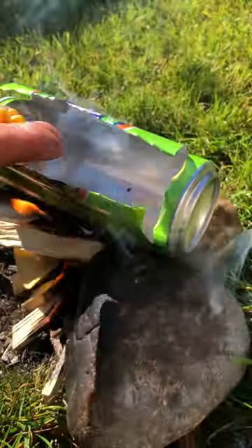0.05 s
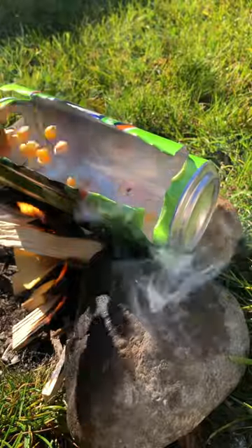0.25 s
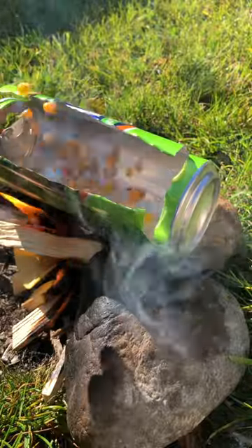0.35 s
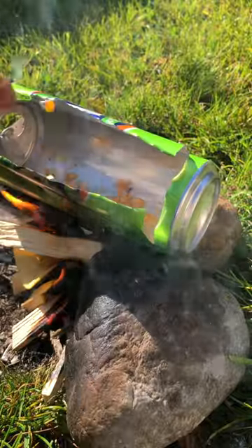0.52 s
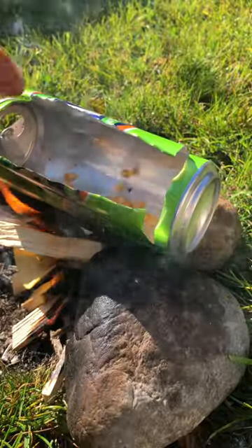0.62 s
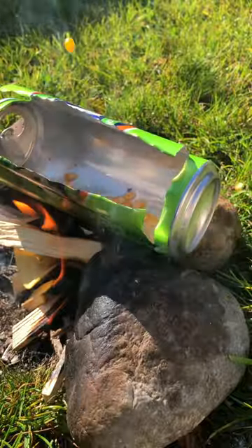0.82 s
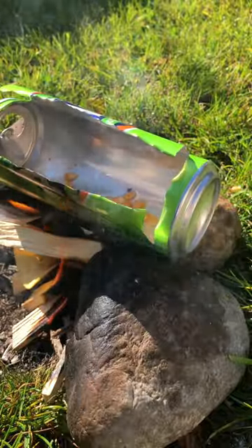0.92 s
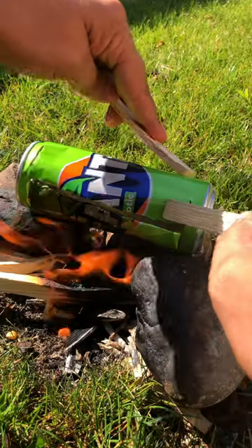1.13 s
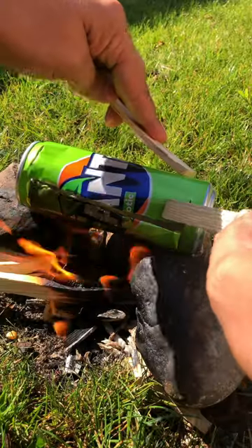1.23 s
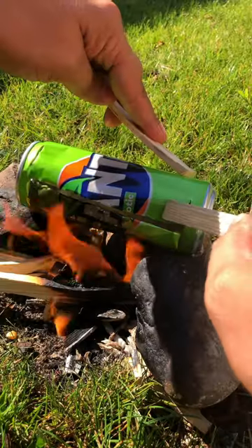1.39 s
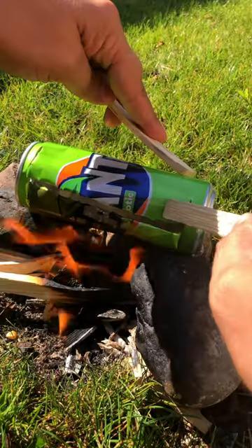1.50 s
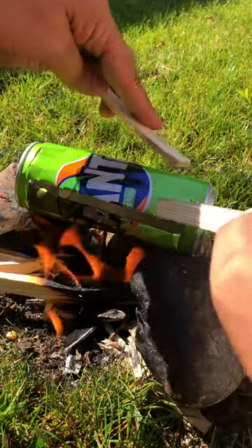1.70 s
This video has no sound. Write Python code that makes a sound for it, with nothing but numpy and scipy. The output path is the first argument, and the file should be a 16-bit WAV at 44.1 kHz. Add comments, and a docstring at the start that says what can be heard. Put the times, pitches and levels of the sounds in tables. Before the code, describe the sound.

Dry corn kernels drop into a thin metal can, rattling brightly and settling. A stick then gives the can one sharp knock and a few faint taps. Close by outdoors, a small fire rumbles and ticks very quietly.

```python
"""Corn kernels in a can on a fire

Dry kernels drop into a cut-open aluminium can lying on a small wood fire, outdoors. They bounce
on the thin wall, which rings in many close modes, and settle. Then the can, steadied with sticks,
gets one sharp knock and a few faint ones. The fire rumbles and ticks under a background hiss."""
import sys
import numpy as np
from scipy import signal
from scipy.fft import rfft, irfft
from scipy.io import wavfile

SR = 44100
rng = np.random.default_rng(int(sys.argv[2]) if len(sys.argv) > 2 else 0)


def master(y):
    """Save y as 16-bit WAV."""
    cut = np.clip(np.atleast_2d(y).T, -1, 1)
    pcm = np.round(cut * 32767)  # scale
    wavfile.write(sys.argv[1], SR, pcm.astype(np.int16))


N = 77175
T = np.arange(N) / SR
SPREAD_S = 0.00072   # a blow takes a moment to spread over the wall
CONTACT_HOLD_S = 0.0024   # contact noise holds this long, then dies


def from_db(db):
    """Decibels to gain."""
    return 10 ** (np.asarray(db) / 20)


def rms_one(x):
    """Scale to unit rms."""
    return x / np.sqrt(np.mean(x ** 2) + 1e-20)


def fade(t, t60):
    """Exponential decay, 60 dB in t60 seconds."""
    return np.exp(-np.log(1000) * t / t60)


def at_hz(points, hz):
    """Read a spectrum on a log-frequency axis."""
    points = np.array(points)
    return np.interp(np.log(hz + 1e-9), np.log(points[:, 0]), points[:, 1])


def fader(points):
    """Gain over the scene from points in seconds and dB."""
    return from_db(np.interp(T, *np.transpose(points)))


def filtered(x, order, hz, kind):
    """Butterworth filter."""
    return signal.sosfilt(signal.butter(order, hz, kind, fs=SR, output="sos"), x)


def noise(spectrum):
    """Unit noise of a given colour."""
    colour = from_db(at_hz(spectrum, np.fft.rfftfreq(N, 1 / SR)))
    return rms_one(irfft(rfft(rng.standard_normal(N)) * colour, N))


def band_noise(low_hz, high_hz):
    """Unit noise between two soft edges."""
    return rms_one(filtered(rng.standard_normal(N), 2, [low_hz, high_hz], "band"))


def add(out, start, sound):
    """Mix a sound in at a start time in seconds."""
    i = int(start * SR)
    out[i:i + len(sound)] += sound[:N - i]


def rings(hz, t60, size):
    """One decaying sine for each mode."""
    return np.sin(2 * np.pi * hz[:, None] * T[:size]) * fade(T[:size], t60[:, None])


def tone(hz, db, t60):
    """A single dying mode."""
    return from_db(db) * np.sin(2 * np.pi * hz * T) * fade(T, t60)


# Colours of the flame rumble and the background hiss. Each row: frequency in Hz, relative density in dB.
RUMBLE_COLOUR = [(25, -15), (48, 0.5), (100, -1.5), (220, -3.5), (400, -16), (700, -17), (2000, -26.5),
                 (6000, -32)]
HISS_COLOUR = [(500, 10.5), (1500, 5), (3000, -1), (6300, 0.5), (7300, 4), (8500, 3), (11000, 1.5),
               (15500, -1.5)]
# Level of the background hiss: sinks after the kernels, steps up abruptly just before the knocks.
# Each row: time in seconds, level in dB.
BACKGROUND_HISS_LEVEL = [(0, -85), (.8, -65), (1.0, -71.5), (1.14, -74.5), (1.15, -61.5), (1.29, -51.5),
                         (1.36, -60.5), (1.75, -58.5)]
# Ticks of the burning wood. Each row: start in seconds, level in dB, band centre in Hz.
WOOD_TICKS = [(0.142, -52.5, 10300), (0.808, -59.5, 6980), (0.912, -48.5, 1340), (0.931, -57.5, 1705)]


def fire_and_hiss():
    """The flames rumble low and the wood ticks, under a fine background hiss."""
    out = from_db(-59.5) * noise(RUMBLE_COLOUR) + fader(BACKGROUND_HISS_LEVEL) * noise(HISS_COLOUR)
    for start, db, hz in WOOD_TICKS:
        add(out, start, from_db(db) * band_noise(hz / 1.63, hz * 1.3) * fade(T, t60=0.047))
    return out


# Strongest modes of the open can. Each row: pitch in Hz, relative level in dB, t60 in seconds.
CAN_MODES = [(324, -34, .36), (366, -34, .22), (493, -35, .5), (556, -34, .4), (945, -12, .1),
             (1127, -11, .15), (1195, -10, .14), (1250, -10, .12), (1385, -11, .17), (1487, -10, .15),
             (1678, -11, .16), (1752, -9, .12), (1800, -8, .12), (1868, -9, .13), (1935, -7, .12),
             (2013, -10, .15), (2146, -12, .14), (3005, -12, .08)]
# Colour of its many weaker wall modes. Each row: frequency in Hz, relative density in dB.
WALL_COLOUR = [(600, -12.5), (850, -9), (1100, 6.5), (1900, 6), (2400, 1.5), (3600, 3), (4700, -0.5),
               (5300, 6), (6100, -1.5), (11500, -6.5), (15500, -12)]


def open_can(size, count=320):
    """Pitches and ringing of the thin wall: a dense shimmer plus a few strong modes."""
    low_hz, high_hz = WALL_COLOUR[0][0], WALL_COLOUR[-1][0]
    wall_hz = low_hz * (high_hz / low_hz) ** ((np.arange(count) + rng.random(count)) / count)
    wall_gain = from_db(at_hz(WALL_COLOUR, wall_hz)) * np.sqrt(wall_hz)
    wall_gain *= from_db(-6) / np.sqrt(np.sum(wall_gain ** 2) / 2)
    wall_t60 = .125 / np.sqrt(wall_hz / 1000)   # higher modes die sooner
    can_hz, can_db, can_t60 = np.transpose(CAN_MODES)
    hz, t60 = np.r_[wall_hz, can_hz], np.r_[wall_t60, can_t60]
    gain = np.r_[wall_gain, from_db(can_db - 9)]
    attack = 1 - np.exp(-T[:size] / SPREAD_S)
    return hz, gain[:, None] * rings(hz, t60, size) * attack


# Main kernel hits. Each row: start in seconds, level in dB, boost or cut of the low ring in dB.
KERNEL_HITS = [(0, -27, 12.5), (0.014, -36.5, 9), (0.027, -38.5, 7.5), (0.044, -39.5, 10.5),
               (.198, -12.5, 2), (0.204, -12, 6.5), (0.209, -26, -19), (.228, -22.5, 15.5), (0.238, -18, 9),
               (0.248, -10, 1.5), (0.252, -21, 0), (0.262, -30.5, 15.5), (0.27, -26.5, 11.5),
               (0.279, -11.5, 3.5), (0.285, -8, -18.5), (.289, -11, 9), (0.3, -13, -1.5), (0.305, -6, -1.5),
               (0.312, -10.5, -6.5), (0.323, -6.5, -15.5), (.333, -6, -3), (0.339, -3.5, -18.5),
               (0.352, -9, -12.5), (0.364, -6, -4), (.378, -9.5, -18.5), (0.387, -13, 9.5),
               (0.397, -6.5, -6), (0.406, -17.5, -5.5), (.414, -7, -31), (.432, -18.5, -31),
               (0.438, -22, -2.5), (.448, -22.5, 4.5), (0.462, -21, -6.5), (.471, -11, -5),
               (0.505, -20, 10), (0.52, -30, -0.5), (0.526, -18, 1.5), (0.535, -14.5, -21),
               (0.538, -20, -19), (.556, -26.5, -17), (0.569, -24, 8.5), (0.583, -17.5, -26),
               (.590, -21, 6), (0.594, -18.5, -13), (0.614, -26.5, -12), (0.643, -23.5, -14),
               (0.657, -33, -17.5), (0.688, -40.5, 3), (0.7346, -42.5, 8.5), (0.737, -28.5, -28.5)]
# Contour of the small bounces in between. Each row: time in seconds, typical level in dB.
BOUNCE_FADER = [(0, -43), (.07, -59), (.19, -61), (.21, -25), (.31, -14.5), (.43, -27.5), (.55, -34.5),
                (.67, -56.5), (.85, -61.5), (1.0, -75.5)]
# Colour of a kernel's contact. Each row: frequency in Hz, relative density in dB.
TICK_COLOUR = [(400, -23), (1500, -4.5), (4000, 5.5), (11500, -1.5), (13500, -6), (15500, -9.5)]


def kernels(bounces_per_s=210, low_ring_edge_hz=3200):
    """Each kernel ticks on the wall and rings its modes, in a mix that depends on where it lands."""
    size = SR // 2
    hz, modes = open_can(size)
    tick_noise = noise(TICK_COLOUR) * from_db(-11.5)
    tick_decay = fade(np.maximum(T[:size] - CONTACT_HOLD_S, 0), t60=.012)
    jitter, softness = rng.random((300, 2)).T
    times = (np.arange(len(jitter)) + jitter) / bounces_per_s
    bounce_db = np.interp(times, *np.transpose(BOUNCE_FADER)) - 3 * (1 + np.log(softness + .01))
    bounces = np.c_[times, bounce_db, np.zeros_like(times)]
    out = np.zeros(N)
    for start, db, low_db in np.vstack([bounces, KERNEL_HITS]):
        landing = np.sqrt(2) * np.cos(2 * np.pi * rng.random(len(hz)))
        if start >= BOUNCE_FADER[-1][0]:   # the kernels have settled
            continue
        low_shelf = from_db(low_db / (1 + (hz / low_ring_edge_hz) ** 2))
        ring = (landing * low_shelf) @ modes
        tick = np.roll(tick_noise, -int(start * SR))[:size] * tick_decay
        add(out, start, from_db(db) * (ring + tick))
    return filtered(out, 4, 210, "high")   # the small can gives no bass


def can_hum():
    """One low mode hums on from the first kernels."""
    return tone(hz=556, db=-49, t60=0.9)


# Damped modes of the steadied can. Each row: base pitch in Hz, relative level in dB, base t60 in seconds.
HELD_MODES = [(600, -17, .035), (830, -13, .018), (1015, 1, .033), (1150, -7, .035), (1915, -4, .025),
              (2250, -13, .015), (2750, -11, .018), (3250, -12, .018)]


def held_can(pitch, hollow_db=0, bright_db=0, scatter_db=0, sustain=1):
    """The short ring of the can between sticks: hollow low modes and bright high ones."""
    hz, mode_db, t60 = np.transpose(HELD_MODES)
    drive_db = np.where(hz > 1100, bright_db, hollow_db) + scatter_db
    polarity = (-1) ** np.arange(len(hz))
    return (polarity * from_db(mode_db + drive_db)) @ rings(hz * pitch, sustain * t60, SR // 4)


# Strokes of the rubbing stick. Each row: time in seconds, level in dB.
RUB_FADER = [(1.15, -80), (1.23, -50), (1.33, -61), (1.41, -59.5), (1.47, -83), (1.54, -67.5), (1.6, -60.5),
             (1.655, -55.5), (1.69, -81.5), (1.75, -82)]


def stick_rub():
    """Gritty friction from a stick stirs the can's damped modes."""
    grit = rng.standard_normal(N) ** 3
    rub = signal.fftconvolve(grit, held_can(pitch=1.14, sustain=2))[:N]
    rub = filtered(rub, 1, 1100, "low")
    return rms_one(rub) * fader(RUB_FADER) * (T > RUB_FADER[0][0])


# Knocks on the steadied can. Each row: start in seconds, hollow ring in dB, bright ring in dB,
# dry crack in dB, pitch ratio set by the grip.
CAN_KNOCKS = [(1.1947, -19.5, -19, -14, 1.02), (1.2336, -30.5, -35, -43.5, 1), (1.242, -28, -45, -62, 1.19),
              (1.26, -26, -37, -48, 1.03), (1.2958, -37.5, -49, -44, 1.16), (1.318, -33, -31, -48, 0.95),
              (1.368, -35, -46, -51, 1.08), (1.388, -38.5, -34.5, -46, 1.076),
              (1.404, -44.5, -58, -53, 0.94), (1.641, -45, -64, -49.5, 0.99)]
# Colour of the crack. Each row: frequency in Hz, relative density in dB.
CRACK_COLOUR = [(90, -30), (250, -12), (520, -1.5), (1000, 13.5), (1500, 0), (3400, -3), (4500, 5),
                (10000, 2), (15500, -2)]
# Resonances in the crack. Each row: pitch in Hz, relative level in dB, t60 in seconds.
SNAP_MODES = [(555, -9, .025), (7035, -3, .02), (7560, -2, .02), (8326, -2, .02)]


def knocks():
    """Each knock is a dry crack and a short ring of the held can."""
    size = SR // 4
    t, out = T[:size], np.zeros(N)
    attack = 1 - np.exp(-t / SPREAD_S)
    crack_decay = fade(np.maximum(t - CONTACT_HOLD_S, 0), t60=0.015)
    crack_tail = from_db(-30) * fade(t, t60=0.21)
    snap_hz, snap_db, snap_t60 = np.transpose(SNAP_MODES)
    snap = from_db(snap_db) @ rings(snap_hz, snap_t60, size)
    for start, hollow_db, bright_db, crack_db, pitch in CAN_KNOCKS:
        ring = held_can(pitch, hollow_db, bright_db, scatter_db=rng.normal(0, 2.8, len(HELD_MODES)))
        crack = (crack_decay + crack_tail) * noise(CRACK_COLOUR)[:size] + snap
        if crack_db < -40:   # light taps are duller
            crack = filtered(crack, 1, 6000, "low")
        add(out, start, ring * attack + from_db(crack_db) * crack)
    add(out, 1.316, tone(hz=3200, db=-46, t60=0.099))   # one knock also leaves a thin ping
    return filtered(out, 2, 260, "high")


# Swell of the groan. Each row: time in seconds, level in dB.
GROAN_FADER = [(1.63, -72), (1.665, -52), (1.69, -80), (1.75, -94.5)]


def can_groan(hz=625):
    """A stick presses harder and the can groans in a narrow band."""
    return band_noise(hz / 1.105, hz * 1.03) * fader(GROAN_FADER) * (T > GROAN_FADER[0][0])


def scene():
    """A mono mix, everything close by in the open air."""
    return (fire_and_hiss() + knocks() + can_groan() + stick_rub() + kernels() + can_hum())[None]


def record(dry):
    """Trim the level, then cut the deepest bass and the very top."""
    x = filtered(0.81 * dry, 2, 30, "high")
    return signal.sosfilt(signal.ellip(12, .1, 80, 15800, fs=SR, output="sos"), x)


dry = scene()
out = record(dry)
master(out)
```